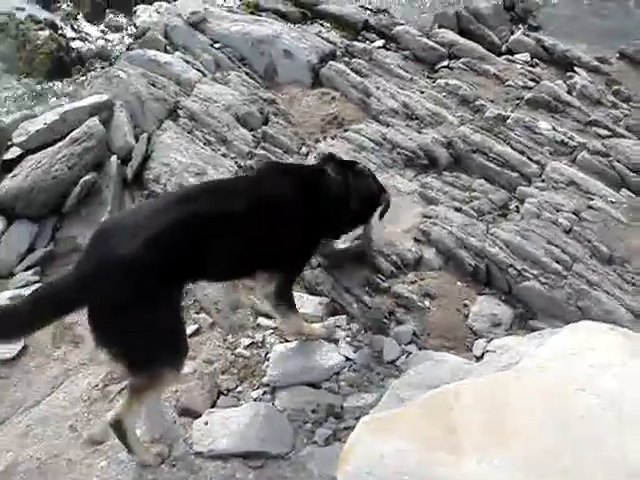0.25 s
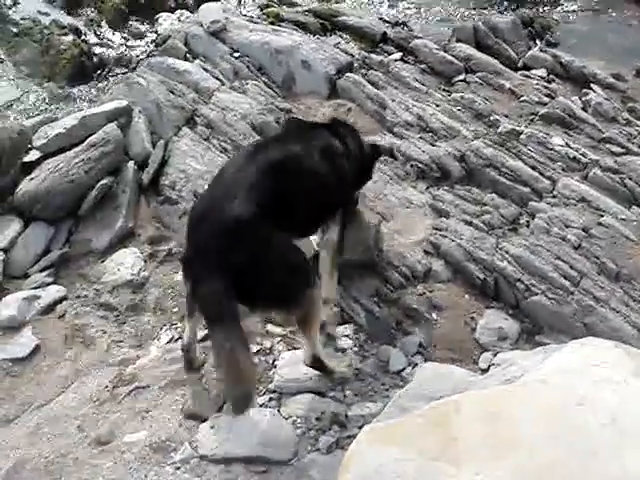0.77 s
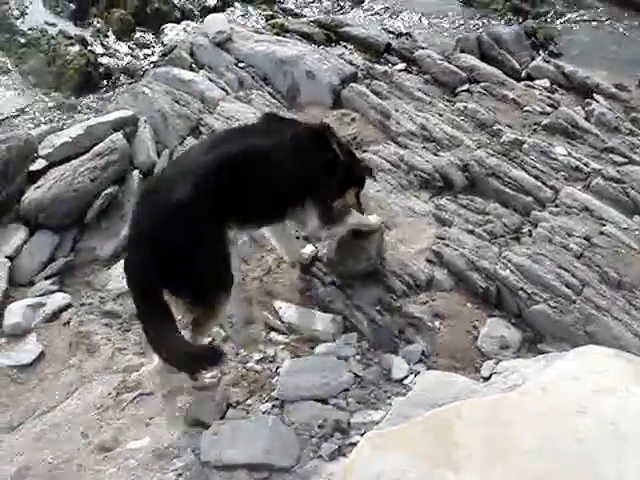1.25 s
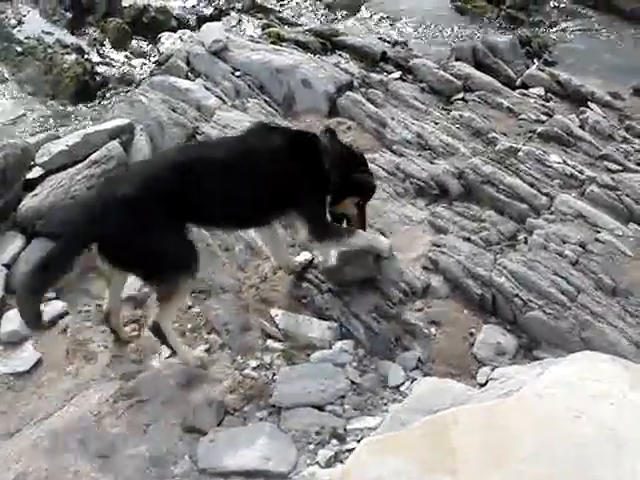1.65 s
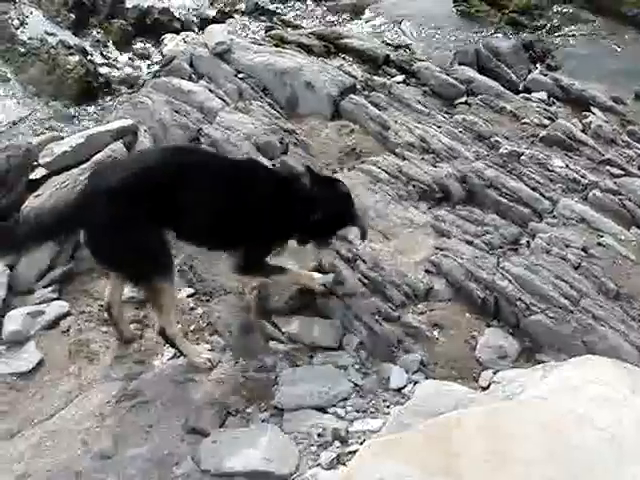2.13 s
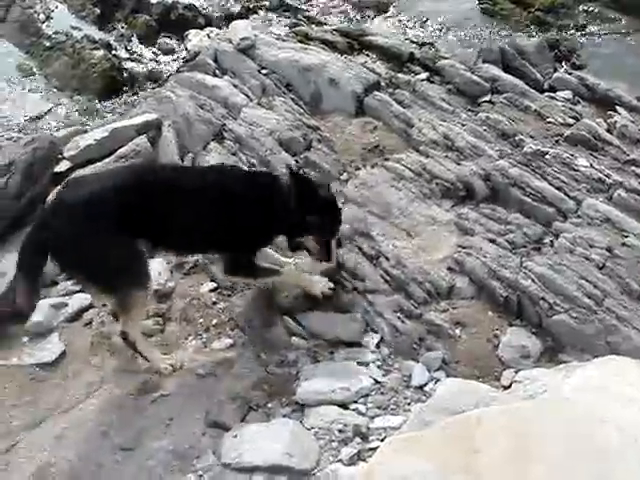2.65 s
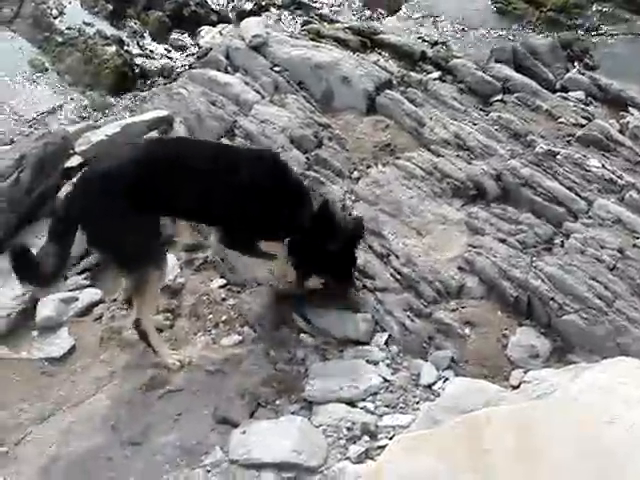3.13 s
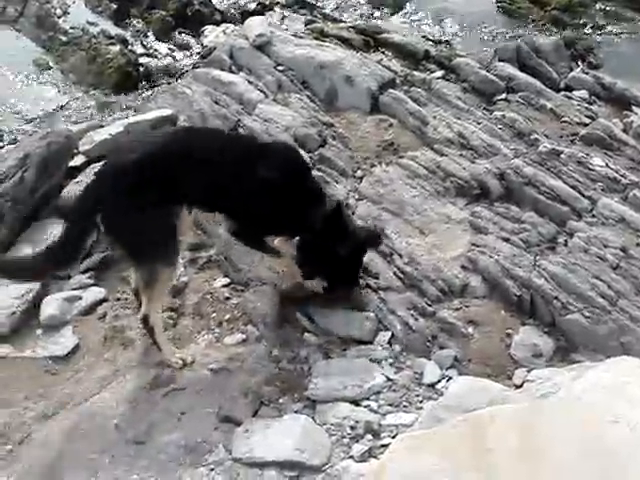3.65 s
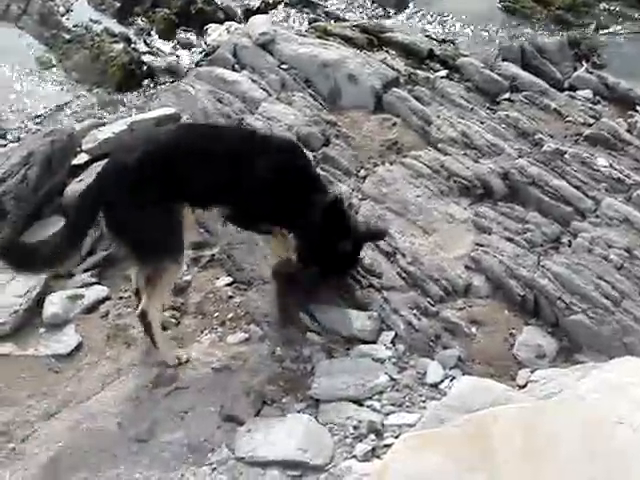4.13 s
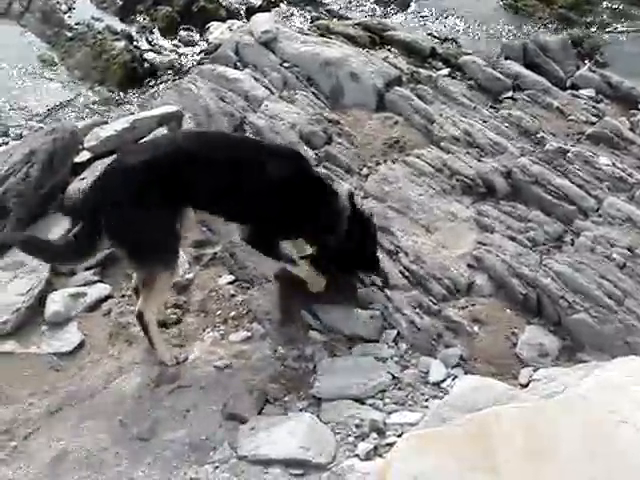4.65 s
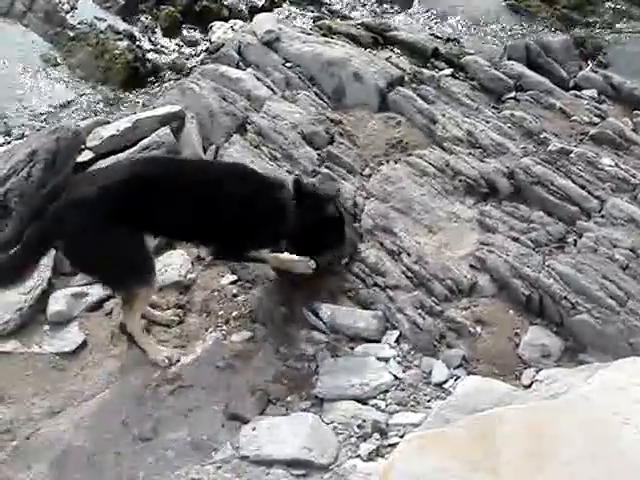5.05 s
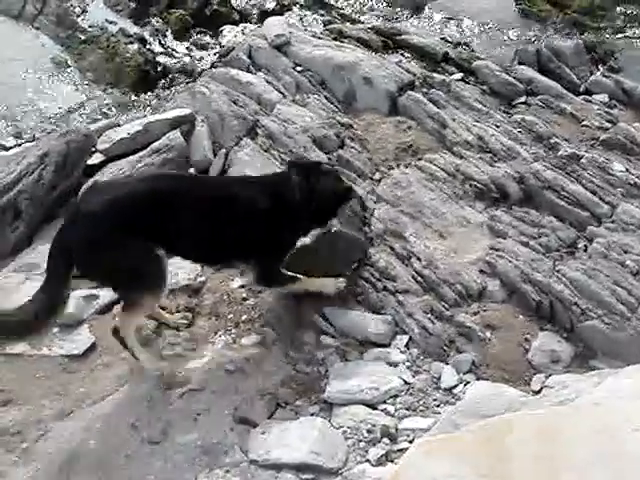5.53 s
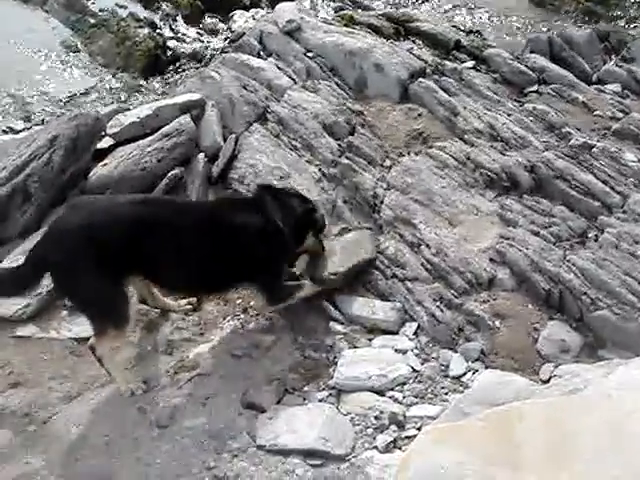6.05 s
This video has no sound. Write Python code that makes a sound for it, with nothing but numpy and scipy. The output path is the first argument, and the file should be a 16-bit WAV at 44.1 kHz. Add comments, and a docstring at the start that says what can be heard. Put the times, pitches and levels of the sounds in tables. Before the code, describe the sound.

A close, loud dog on a rocky shore, with faint wave wash and short reflections off stone. A yip is already sounding at 0 s; others leap up and fall at 0.5, 0.8 (lower, softer) and 1.1. A wavering whine runs 1.4-1.9. At 2.0 stones clack sharply amid claw scratches. A second whine, 2.3-2.9, cracks high around 2.75. The third, from 3.1, swells near 3.7 and drops into a short rattling growl from 3.8 to 4.05. Dull slab thuds come around 4.3-4.5, then a strained whine, 4.5-5.05, breaks downward. Heavy thuds cluster at 5.05-5.25. Piercing yips follow at 5.4 and 5.7 with a faint whimper between, a stone clack at 6.0 and a lower, rough yip at 6.1. Thin nasal whistles, pebble ticks and scratches recur; a low breeze rises after 2 s, with brief gusty bumps.

```python
"""On a rocky shore, an excited dog yips and whines while it paws a slab out of the sand.
Its voice is a stack of harmonics shaped by mouth and throat; it glides, cracks and once sinks into a growl.
Thin gliding tones whistle through the nose. Stones clack and the slab thuds as ringing modes,
and claws scratch with short bursts of noise. Coloured noise makes the small waves and a faint wind rumble."""
import sys
import numpy as np
from scipy import signal
from scipy.fft import rfft, irfft, next_fast_len
from scipy.io import wavfile

SR = 44100
rng = np.random.default_rng(int(sys.argv[2]) if len(sys.argv) > 2 else 0)


def to_wav(sig):
    """Store sig (one row per channel, or 1-D mono) as 16-bit WAV at the path in sys.argv[1].

    Samples outside -1..1 are clipped; the rate is SR.
    """
    pcm = np.clip(np.atleast_2d(sig), -1, 1) * 32767
    pcm = np.round(pcm).astype(np.int16)
    wavfile.write(sys.argv[1], SR, pcm.T)  # frames by channels


N = 276931
TIME = np.arange(N) / SR

# colours of the wave wash, its fizz and the wind: pitch_hz, relative level_db
SURF_COLOUR = [(100, -26), (250, -6), (500, -0.5), (900, 4), (1400, 2.5), (2200, -1), (3500, -5.5),
               (6000, -16.5), (10000, -65.5)]
SPRAY_COLOUR = [(2500, -24), (5000, -1.5), (7000, -4), (10000, -5.5)]
WIND_COLOUR = [(20, -13), (60, 0.5), (110, -0.5), (220, -5.5), (400, -20), (900, -23), (3000, -70)]
SURF_DB, SPRAY_DB = -47, -52   # the sea between waves
# small waves wash in: middle_s, half_length_s, surf_db, spray_db
WAVES = [(2.285, 0.75, -46, -52), (4.564, 0.99, -45, -53)]
# the breeze picks up once: calm and breezy level, and when it starts and stops rising
CALM_DB, BREEZE_DB, BREEZE_RISE_S = -69.5, -51.5, (2.1, 2.9)
# short gusts on top of the breeze: middle_s, half_length_s, level_db
GUSTS = [(2.483, 0.098, -38), (3, 0.12, -42), (3.516, 0.16, -44.5), (4.38, 0.11, -35.5), (4.495, 0.02, -32),
         (5.19, 0.18, -31), (5.37, 0.037, -33), (5.685, .03, -39), (6.28, .04, -30)]

# single echoes off nearby boulders, before the echoes are dulled: delay_s, level_db
BOULDERS = [(.0125, -23), (.029, -22.5)]

# ways a stone and the slab ring: pitch_hz, relative level_db, time to fall by 60 dB t60_s
STONE_MODES = [(430, -11.5, 0.013), (720, -4.5, 0.013), (1120, -6, .016), (2230, -22.5, 0.031),
               (3300, -21.5, .008)]
SLAB_MODES = [(125.7, -5, 0.12), (190, -1, 0.04), (278, -5, 0.043), (463, -6, 0.03)]
GRIT_PER_S, GRIT_DB, GRIT_SPREAD_DB = 25, -45.5, 1.5   # pebbles shift under the paws
# claws and grit scratch the rock: start_s, peak_db, ring_hz
SCRATCHES = [(0.935, -30, 8240), (1.361, -30.5, 5570), (1.997, -22, 4440), (2.018, -18.5, 4100),
             (2.02, -21, 9600), (2.072, -21.5, 7960), (2.085, -23, 7850), (2.113, -30, 8850),
             (2.235, -18.5, 9800), (2.24, -34, 8950), (2.911, -21.5, 4200), (2.952, -28, 4184),
             (2.953, -23.5, 8150), (3.575, -23.5, 6260), (3.944, -27, 8530), (5.174, -23, 6440)]
# stone knocks on stone: start_s, strike_db
KNOCKS = [(.188, -27), (1.998, -14), (2.019, -7.5), (2.023, -16.5), (2.085, -28), (5.079, -32),
          (5.993, -9.5), (6.022, -24)]
# the slab rocks in its bed of sand: start_s, strike_db
THUDS = [(3.108, -28), (4.293, -24), (4.303, -19), (4.369, -17), (4.393, -27), (4.481, -22.5),
         (5.061, -15.5), (5.08, -13.5), (5.138, -17.5), (5.152, -14), (5.178, -9), (5.19, -9), (5.212, -14),
         (5.222, -16), (5.24, -15), (5.68, -25), (5.703, -19.5)]

# nasal whistles: start_s, end_s, start_hz, end_hz, middle level_db
WHISTLES = [(0.23, 0.298, 4980, 5450, -37), (0.812, 0.829, 5070, 5370, -41.5),
            (0.895, 0.912, 5300, 5080, -41), (1.387, 1.456, 4920, 5330, -47),
            (2.252, 2.324, 5140, 5030, -42), (3.107, 3.138, 4920, 5400, -41),
            (3.219, 3.289, 5620, 5800, -40), (3.298, 3.56, 5700, 5680, -51.5),
            (4.29, 4.312, 5000, 5400, -38)]

# resonances of the growling throat: pitch_hz, relative level_db, time to fall by 60 dB t60_s
GROWL_MODES = [(219, -13, 0.043), (550, 0, 0.041), (730, 1, 0.024), (1105.4, -1.5, 0.028),
               (2180, -6.5, 0.023), (2860, -9.5, 0.0078)]
# the third whine sinks into a growl, with one slow flap to three cycles of the voice
GROWL_START_S, GROWL_END_S, GROWL_FADE_S, CYCLES_PER_FLAP = 3.805, 4.025, 0.023, 3
GROWL_DB, GROWL_DB_PER_S, GROWL_UNEVEN, GROWL_SETTLE_S = -17.5, -45, .2, 0.091

# colour of the breath noise in the voice: pitch_hz, relative level_db
BREATH_COLOUR = [(200, -35.5), (450, -12), (800, -1.5), (1400, 12.5), (2300, 10.5), (3300, -31.5),
                 (6000, -26), (10000, -25)]
# weak upper resonances of the muzzle: pitch_hz, relative level_db
OVERTONES = [(1000, -28), (2800, -34), (3800, 9), (4700, 1), (5600, 7.5), (6500, 1), (7400, 3), (8300, -3),
             (9600, 0.5), (10500, -36.5)]
# the voice cracks into unequal cycles: start_s, end_s, in_between_partials_db, added_roughness (0-1)
CRACKS = [(2.655, 2.742, -20, 0.28), (2.775, 2.815, -19, 0.6), (2.836, 2.902, -13.5, 0.61),
          (3.811, 3.887, -15, 0.27), (4.595, 4.685, -14.5, 0.01), (4.889, 4.96, -15.5, 0.11),
          (4.952, 5.08, -17.5, 0.63)]
MIDDLE_PITCH_HZ, MOUTH_FOLLOWS_PITCH = 600, 0.56   # the mouth opens as pitch climbs (octaves per octave)

# the path of each long whine: time_s, pitch_hz, level_db (before WHINE_GAIN_DB),
# throat_share_db (before its upper limit), jaw_opening (0-1), throat_hz
WAVERING_WHINE = [(1.4, 573, -40.5, -11, 0.4, 1890), (1.42, 703, -12, -6.5, 0.56, 1860),
                  (1.444, 757, -14, -3, 0.81, 1970), (1.47, 736, -10.5, -2.5, 0.41, 2100),
                  (1.49, 616, -9, -1, 0.64, 1960), (1.564, 509, -17.5, -2, 0.41, 1930),
                  (1.608, 686.4, -13.5, -2, 0.64, 1970), (1.63, 677, -13, -2.5, 0.47, 2050),
                  (1.664, 608, -14, -6, 0.6, 1920), (1.702, 644, -18.5, -9, 0.42, 2110),
                  (1.762, 628, -14, -8, 0.5, 2093), (1.828, 543.6, -17, -9.5, 0.48, 2150),
                  (1.885, 462, -34, -14, 0.3, 1890)]
RISING_WHINE = [(2.28, 545, -33, -17, 0.29, 1930), (2.294, 525.5, -22, -26, 0.44, 2030),
                (2.344, 559.3, -16.5, -19.5, 0.69, 2070), (2.378, 639, -25.5, 0.5, 0.31, 1890),
                (2.452, 714.4, -21, -16, 0.58, 2080), (2.53, 686.5, -13, 5, 0.35, 2000),
                (2.566, 586.6, -9, -1, 0.62, 1980), (2.63, 522.4, -16, -9, 0.53, 1940),
                (2.664, 703.4, -9, 1, 0.51, 1790), (2.7, 810, -9, -12, 0.6, 1620),
                (2.738, 1183, -8.5, -6, 0.67, 2330), (2.77, 1152, -10, -0.5, 0.49, 2260),
                (2.808, 813, -24, -9, 0.84, 2060), (2.816, 750, -7.5, -19, 0.5, 1810),
                (2.836, 747, -10.5, -30, 0.37, 1640), (2.85, 523, -23.5, -9, 0.48, 1890),
                (2.876, 478, -20, -13, 0.38, 2260), (2.93, 455, -36.5, -16, 0.37, 2328)]
WHINE_INTO_GROWL = [(3.135, 535, -37, -14, 0.33, 1650), (3.149, 535.6, -19, -27, 0.61, 1640),
                    (3.259, 603, -22, -17, 0.52, 1870), (3.323, 712.4, -19.5, -23, 0.43, 2170),
                    (3.343, 722.2, -18.5, -25, 0.62, 1940), (3.509, 471.3, -17.5, -24, 0.46, 2100),
                    (3.651, 480.5, -14, -11, 0.32, 2050), (3.663, 495.6, -10.5, -16.5, 0.56, 1930),
                    (3.715, 668.6, -4.5, -12.5, 0.51, 1820), (3.759, 509.6, -9, -12, 0.49, 1640),
                    (3.819, 449, -16, -12.5, 0.54, 1960), (3.841, 362.4, -22, -22, 0.59, 2180),
                    (3.893, 351.5, -25, -22, 0.5, 2200), (3.923, 371.5, -26, -24, 0.52, 2190),
                    (3.983, 336.6, -24, -11, 0.44, 2160), (4.045, 348, -24.5, -35, 0.55, 2110),
                    (4.07, 351.8, -39, -5, 0.5, 1975)]
STRAINING_WHINE = [(4.492, 457, -33, -28, 0.32, 1840), (4.502, 493, -8.5, -7, 0.4, 1810),
                   (4.528, 607, -7.5, -11.5, 0.18, 2000), (4.552, 670, -9, -3.5, 0.22, 1900),
                   (4.618, 491.2, -15, -1.5, 0.52, 1930), (4.768, 596, -9, -10.5, 0.34, 1880),
                   (4.816, 587, -9.5, -16, 0.65, 2230), (4.87, 574, -8.5, -10.5, 0.66, 1760),
                   (4.904, 654.7, -9, -10.5, 0.81, 1750), (4.912, 615, -20, -16, 0.55, 1765),
                   (4.922, 476.5, -12, -4.5, 0.46, 1640), (4.956, 447.5, -17, -3, 0.63, 1730),
                   (4.972, 377.4, -30, -19, 0.56, 1820), (5.01, 345, -28, -27, 0.59, 1750),
                   (5.05, 346, -30.5, -22, 0.37, 1670)]
# how each whine is voiced: path, mouth_hz (at middle pitch, jaw half open), high_overtones_db,
# breath_db (at full roughness)
WHINES = [(WAVERING_WHINE, 927, -49, -3.5), (RISING_WHINE, 824, -41.5, -17),
          (WHINE_INTO_GROWL, 761, -50, -3.5), (STRAINING_WHINE, 687, -51.5, -20)]
WHINE_GAIN_DB, WHINE_ROUGH, MAX_THROAT_SHARE = 3.5, 0.043, 0.83

# a yip is one arch of pitch: start_s, attack_s, rise_s, fall_s, tail_s, start_hz, top_hz, end_hz,
# level_db, fade_by_the_end_db, mouth_hz (at middle pitch), throat_over_mouth_db, high_overtones_db,
# flank_roughness (0-1), clinging_to_registers (0-1)
YIPS = [(-.05, .01, 0.044, 0.024, 0.035, 800, 1493, 730, -7.5, -22, 620, -4, -38.5, 0.26, 0.52),
        (.456, 0.0073, .053, 0.059, 0.0085, 903, 1830, 631, -5.5, -20, 600, 0.5, -41.5, 0.63, 0.78),
        (.832, 0.011, 0.027, 0.022, 0.014, 480, 533, 454, -17.5, -13, 453, 5.5, -46, 0, 0.02),
        (1.068, 0.014, 0.041, .026, 0.093, 763, 1161, 790, -7.5, -35.5, 860, 3.5, -45.5, 0.23, 0.07),
        (5.368, 0.01, .082, 0.053, .012, 600, 1975, 637, -6.5, -26, 660, -7, -29.5, 0.77, 0.79),
        (5.56, 0.034, 0.022, 0.054, .06, 532, 550, 505, -37.5, -8, 540, -7, -57, 0.2, .05),
        (5.718, 0.031, .084, 0.055, 0.021, 538, 1847, 660, -6.5, -27, 620, -8, -35, 0.73, 0.94),
        (6.115, .018, 0.03, .062, .036, 720, 1000, 486, -12.5, -6, 645, -2, -44, 0.44, 0.08)]
YIP_HOLD_S, GLIDE_BEND = .01, .8   # time at the top; a bend of 1 makes glides start and end level
YIP_ONSET_DB, FADE_POWER, END_FADE_S = -18.5, 2.37, 0.014   # a yip swells from this, then dies ever faster
RING_HZ, RING_HALF_WIDTH_HZ, RING_DB = 730, 26.6, 6.5   # a yip leaps out as its pitch crosses this
YIP_THROAT_HZ, YIP_RASP_DB, YIP_TOP_ROUGH = 2050, -14.5, 0.077
REGISTER_HZ, REGISTER_STEP_HZ = 1890, 528   # yips cling to pitches this far apart
REST_HZ, SAG_POWER, TAIL_ROUGH = 439, 2.5, 0.19   # in its tail a yip sags to the resting pitch and frays

LIMIT_DB, LIMIT_ATTACK_S, LIMIT_RELEASE_DB_PER_S = -3, 0.00073, 251.5
CUTOFF_HZ = 10150


def from_db(db):
    """Decibels to gain."""
    return 10 ** (np.asarray(db) / 20)


def rms_one(x):
    """Scale to unit power."""
    return x / np.sqrt(np.mean(x ** 2) + 1e-20)


def unit_sum(partials):
    """Scale the partials so that their powers add up to one at every moment."""
    return partials / np.sqrt(np.sum(partials ** 2, axis=0))


def curves(rows, t):
    """The columns of a table, joined by straight lines in time."""
    s, *columns = np.transpose(rows)
    return [np.interp(t, s, column) for column in columns]


def low_pass(x, hz):
    """Keep the slow or dull part of a signal."""
    return signal.sosfilt(signal.butter(2, hz, fs=SR, output="sos"), x)


def noise(colour):
    """Steady noise of a given colour, at unit power."""
    hz, db = np.transpose(colour)
    size = next_fast_len(N)
    bins = np.maximum(np.fft.rfftfreq(size, 1 / SR), 1)
    gain = from_db(np.interp(np.log(bins), np.log(hz), db))
    return rms_one(irfft(rfft(rng.standard_normal(size)) * gain, size)[:N])


def flutter(rate_hz, size):
    """Random unsteadiness, mostly slower than the given rate, at unit power."""
    slow = low_pass(rng.standard_normal(size + SR // 10), rate_hz)
    return rms_one(slow[-size:])


def gate(t, start, end, fade):
    """One between start and end, with rounded edges."""
    return np.sin(np.pi / 2 * np.clip(np.minimum(t - start, end - t) / fade, 0, 1)) ** 2


def swell(middle_s, half_length_s, db):
    """Gain of one smooth rise and fall."""
    return from_db(db) * np.exp(-((TIME - middle_s) / half_length_s) ** 2)


def ring(force, hz, t60):
    """A unit click sets a dying sine of starting height 1 ringing."""
    r, w = from_db(-60 / (t60 * SR)), 2 * np.pi * hz / SR
    return signal.lfilter([0, np.sin(w)], [1, -2 * r * np.cos(w), r * r], force + 1e-18)


def resonance(hz, centre, half_width_hz):
    """Gain of a resonance with steep skirts."""
    return 1 / (1 + ((hz - centre) / half_width_hz) ** 2)


def blows(events, modes):
    """Each blow strikes every mode with a slightly different strength."""
    s, strike_db = np.transpose(events)
    out, chance_db = np.zeros(N), 2 * rng.standard_normal((len(s), len(modes)))
    for k, (hz, db, t60) in enumerate(modes):
        clicks = np.zeros(N)
        clicks[np.round(s * SR).astype(int)] = from_db(strike_db + db + chance_db[:, k])
        out += (-1) ** k * ring(clicks, hz, t60)
    return out


def waves():
    """Water washing and fizzing is coloured noise that swells with each wave and flickers."""
    surf = from_db(SURF_DB) + sum(swell(s, half, db) for s, half, db, _ in WAVES)
    spray = from_db(SPRAY_DB) + sum(swell(s, half, db) for s, half, _, db in WAVES)
    lap, fizz = from_db(1.3 * flutter(25, N)), from_db(3 * flutter(90, N))
    return surf * lap * noise(SURF_COLOUR) + spray * fizz * noise(SPRAY_COLOUR)


def wind():
    """Wind is lumpy low noise: a breeze that rises once, plus short gusts."""
    breeze = from_db(np.interp(TIME, BREEZE_RISE_S, [CALM_DB, BREEZE_DB]))
    level = breeze + sum(swell(*gust) for gust in GUSTS)
    return level * from_db(3 * flutter(25, N)) * noise(WIND_COLOUR)


def rocks(x, near_t60=0.25, near_db=-18, far_t60=0.22, far_db=-24, dull_hz=1800, first_s=0.011):
    """Boulders return single echoes; stones and farther rock faces scatter a dull, dying tail."""
    t = TIME[:SR // 2]
    tail = np.zeros(len(t))
    for t60, db in ((near_t60, near_db), (far_t60, far_db)):
        echoes = rng.standard_normal(len(t)) * np.exp(-np.log(1000) * t / t60) * (t > first_s)
        tail += from_db(db) * echoes / np.sqrt(np.sum(echoes ** 2))
    for delay, db in BOULDERS:
        tail[round(delay * SR)] += from_db(db)
    return signal.fftconvolve(x, low_pass(tail, dull_hz))[:N]


def grit():
    """Pebbles tick against each other at random and ring like small blows on stone."""
    s = TIME[rng.random(N) < GRIT_PER_S / SR]
    strike_db = GRIT_DB + GRIT_SPREAD_DB * rng.standard_normal(len(s))
    return blows(np.column_stack([s, strike_db]), STONE_MODES)


def claws(decay_s=0.0035, ring_t60=0.0013, crack=0.53):
    """Each scratch is a few milliseconds of friction on a small ringing chip."""
    out, t = np.zeros(N), TIME[:SR // 20]
    for s, db, hz in SCRATCHES:
        friction = rng.standard_normal(len(t)) * np.exp(-t / decay_s)
        scratch = rms_one(ring(friction, hz, ring_t60)) + crack * rms_one(friction)
        out[round(s * SR):][:len(t)] += from_db(db) * scratch / np.abs(scratch).max()
    return out


def knocks():
    """Stone striking stone rings in short, bright modes."""
    return blows(KNOCKS, STONE_MODES)


def slab():
    """The rocking slab rings low, but is too small to send out deep bass."""
    no_bass = signal.butter(2, 75, "high", fs=SR, output="sos")
    return from_db(-0.5) * signal.sosfilt(no_bass, blows(THUDS, SLAB_MODES))


def nose(waver=0.0069):
    """Thin whistles through the nose are gliding sines, unsteady in pitch and level."""
    out, unsteady = np.zeros(N), 1 + waver * flutter(150, N)
    for start, end, start_hz, end_hz, db in WHISTLES:
        span = (TIME >= start) & (TIME <= end)
        t = TIME[span]
        pitch = np.interp(t, [start, end], [start_hz, end_hz]) * unsteady[span]
        tone = np.sin(2 * np.pi * np.cumsum(pitch) / SR)
        out[span] += from_db(db) * gate(t, start, end, fade=0.0052) * tone
    return out * from_db(3 * flutter(40, N))


def growl():
    """Slow flaps, uneven at first, set the throat ringing as they die away."""
    age = np.maximum(TIME - GROWL_START_S, 0)
    rate = curves(WHINE_INTO_GROWL, TIME)[0] / CYCLES_PER_FLAP
    uneven = GROWL_UNEVEN * np.exp(-age / GROWL_SETTLE_S)
    cycles = np.cumsum(rate * (1 + uneven * flutter(150, N))) / SR
    flaps = np.diff(np.floor(cycles), prepend=0) * (1 + uneven * flutter(150, N))
    throat = sum((-1) ** k * from_db(db) * ring(flaps, hz, t60)
                 for k, (hz, db, t60) in enumerate(GROWL_MODES))
    sounding = gate(TIME, GROWL_START_S, GROWL_END_S, GROWL_FADE_S)
    level = from_db(GROWL_DB + GROWL_DB_PER_S * age)
    return throat / np.std(throat[sounding > 0]) * level * sounding


def call(t, pitch, level_db, rough, mouth_hz, throat_hz, throat_db, bite_db, rasp_db, turbulence,
         jitter=0.0027, rough_jitter=0.044, shimmer=1.0, air_db=-38, bite_db_per_octave=5,
         half_order_db=-9, top_hz=3020):
    """Harmonics of the vocal folds pass two moving resonances; roughness shakes them and adds air noise."""
    span = np.round(t * SR).astype(int)
    crack_rough = sum(more * gate(t, start, end, fade=0.012) for start, end, _, more in CRACKS)
    rough = np.clip(rough + crack_rough, 0, 1)
    wobble = 1 + (jitter + rough_jitter * rough) * flutter(130, len(t))
    phase = 2 * np.pi * np.cumsum(pitch * wobble) / SR
    # whole orders are the harmonics; half orders sound when strong and weak cycles alternate
    orders = np.arange(1, 41)[:, None] / 2
    whole, hz = orders % 1 == 0, orders * pitch
    doubling = sum(from_db(db) * gate(t, start, end, fade=0.025) for start, end, db, _ in CRACKS)
    folds = np.where(whole, 1, doubling * (orders > 1)) / np.sqrt(1 + (hz / top_hz) ** 28)
    # mouth and throat side by side; a weak third resonance stays put at the upper edge
    mouth_now_hz = mouth_hz * (pitch / MIDDLE_PITCH_HZ) ** MOUTH_FOLLOWS_PITCH
    mouth = folds * resonance(hz, mouth_now_hz, half_width_hz=84)
    upper_edge = from_db(-25) * resonance(hz, centre=2860, half_width_hz=89)
    throat = folds * (resonance(hz, throat_hz, half_width_hz=336) + upper_edge)
    tract = unit_sum(unit_sum(mouth) + from_db(throat_db) * unit_sum(throat))
    # forced folds snap shut hardest at the top of the call, which adds frayed high overtones
    force_db = bite_db + bite_db_per_octave * np.log2(pitch / pitch.max())
    overtones = from_db(force_db + np.interp(hz, *np.transpose(OVERTONES)))
    overtones *= np.where(whole, 1, from_db(half_order_db))
    overtones *= (1 + 0.47 * flutter(460, len(t))) * (hz < SR / 4)
    shake = 1 + shimmer * rough * np.array([flutter(102, len(t)) for _ in orders])
    # staggered starting phases keep the harmonics from all peaking together
    waves_of_voice = np.sin(orders * phase + np.pi * orders ** 2 / orders.max())
    voice = np.sum((tract + overtones) * shake * waves_of_voice, axis=0)
    air_level = from_db(air_db) + from_db(rasp_db) * rough
    air = air_level * turbulence[span] * (1 + 0.34 * np.sin(phase))   # breath pulses with the folds
    out = np.zeros(N)
    out[span] = (voice + air) * from_db(level_db) * gate(t, t[0], t[-1], fade=0.0026)
    return out


def whines(turbulence):
    """Long glides, nearly clean outside the cracks; the mouth opens with jaw and pitch."""
    out = np.zeros(N)
    for path, mouth_hz, bite_db, rasp_db in WHINES:
        t = TIME[(TIME >= path[0][0]) & (TIME <= path[-1][0])]
        pitch, level_db, share_db, jaw, throat_hz = curves(path, t)
        share = np.minimum(from_db(share_db) ** 2, MAX_THROAT_SHARE)
        throat_db = 10 * np.log10(share / (1 - share))   # throat power against mouth power
        mouth = mouth_hz * 2 ** (jaw - .5)
        out += call(t, pitch, level_db + WHINE_GAIN_DB, WHINE_ROUGH, mouth, throat_hz, throat_db,
                    bite_db, rasp_db, turbulence)
    return out


def glide(progress):
    """How far the pitch has left the top of its arch, 0 to 1."""
    angle = np.pi / 2 * GLIDE_BEND
    return (np.sin(angle * np.clip(progress, 0, 1)) / np.sin(angle)) ** 2


def registers(pitch, cling, sharpness=0.61):
    """Draw a glide towards the nearest register, so that it lingers there and hurries on between."""
    angle = 2 * np.pi * (pitch - REGISTER_HZ) / REGISTER_STEP_HZ
    pull = np.arctan2(sharpness * np.sin(angle), 1 + sharpness * np.cos(angle))
    return pitch - cling * REGISTER_STEP_HZ / (2 * np.pi) * pull


def yips(turbulence):
    """The pitch shoots up, holds, falls and sags; the voice is cleanest at the top, rougher on the flanks."""
    out = np.zeros(N)
    for (start, attack, rise, fall, tail, start_hz, top_hz, end_hz, db, end_db, mouth_hz,
         throat_db, bite_db, rough, cling) in YIPS:
        top = start + rise
        turn = top + YIP_HOLD_S
        t = TIME[(TIME >= start) & (TIME <= turn + fall + tail)]
        before, after = glide((top - t) / rise), glide((t - turn) / fall)
        in_tail = np.maximum(t - turn - fall, 0) / tail
        sag = (REST_HZ / end_hz) ** (in_tail ** SAG_POWER)
        arch = top_hz + before * (start_hz - top_hz) + after * (end_hz - top_hz)
        pitch = registers(arch * sag, cling)
        onset_db = YIP_ONSET_DB * np.maximum(1 - (t - start) / attack, 0)
        fade_db = end_db * (np.maximum(t - turn, 0) / (fall + tail)) ** FADE_POWER
        leap_db = RING_DB * resonance(pitch, RING_HZ, RING_HALF_WIDTH_HZ)
        roughness = YIP_TOP_ROUGH + rough * (before + after) + TAIL_ROUGH * in_tail
        yip = call(t, pitch, db + onset_db + fade_db + leap_db, roughness, mouth_hz, YIP_THROAT_HZ,
                   throat_db, bite_db, YIP_RASP_DB, turbulence)
        out += yip * gate(TIME, -np.inf, t[-1], END_FADE_S)
    return out


def dog():
    """All the yips and whines, sharing one stream of breath noise."""
    turbulence = noise(BREATH_COLOUR)
    return whines(turbulence) + yips(turbulence)


def scene():
    """The dog and its digging, among the rocks, before the sea; only the voice echoes."""
    shore = waves() + wind()
    digging = grit() + claws() + knocks() + slab()
    voice = nose() + growl() + dog()
    return (shore + digging + rocks(voice) + voice)[None]


def limiter(x):
    """Turns loud sounds down quickly and recovers at a steady rate."""
    over_db = np.maximum(20 * np.log10(np.abs(x) + 1e-9) - LIMIT_DB, 0)
    recovered_db = LIMIT_RELEASE_DB_PER_S * TIME
    cut_db = np.maximum.accumulate(over_db + recovered_db, axis=-1) - recovered_db
    r = np.exp(-1 / (LIMIT_ATTACK_S * SR))
    return x * from_db(-signal.lfilter([1 - r], [1, -r], cut_db))


def record(dry, ceiling=0.79):
    """Loud sounds are limited, their peaks rounded, and the top is cut."""
    held = limiter(dry)
    rounded = held / (1 + (held / ceiling) ** 6) ** (1 / 6)
    return signal.sosfilt(signal.ellip(10, .2, 70, CUTOFF_HZ, fs=SR, output="sos"), rounded)


dry = scene()
out = record(dry)
to_wav(out)
```